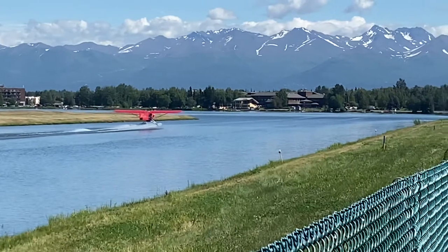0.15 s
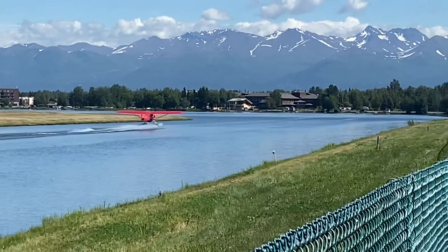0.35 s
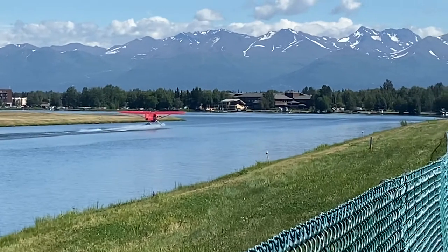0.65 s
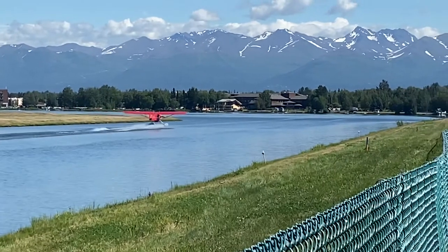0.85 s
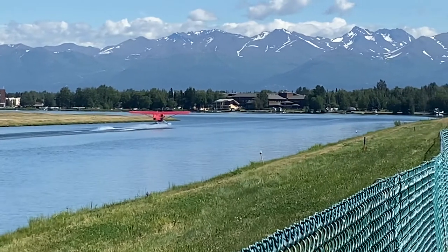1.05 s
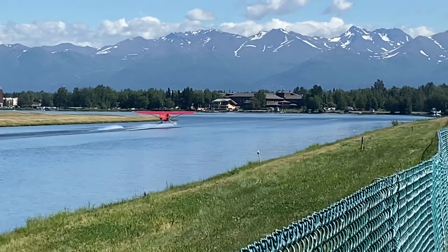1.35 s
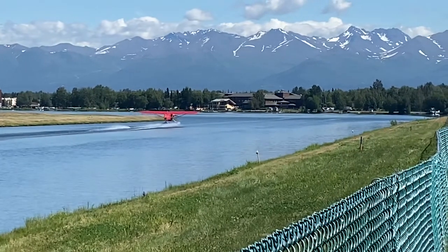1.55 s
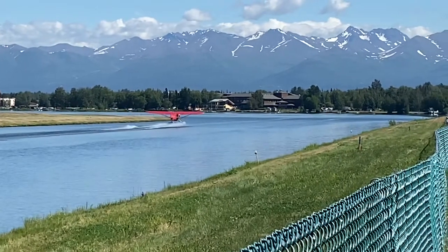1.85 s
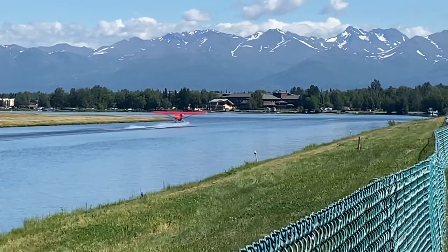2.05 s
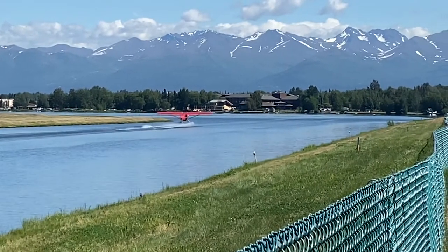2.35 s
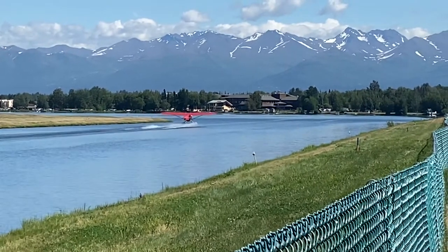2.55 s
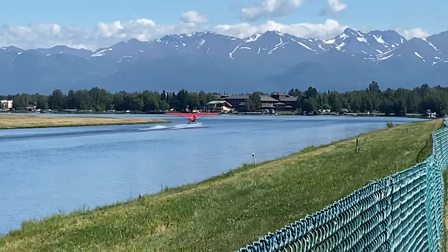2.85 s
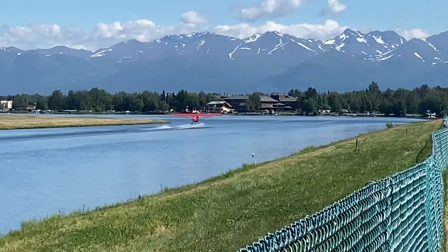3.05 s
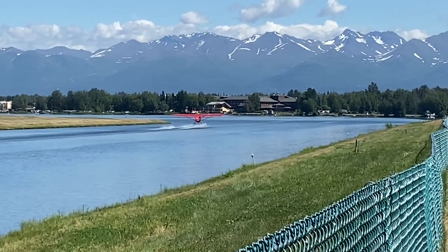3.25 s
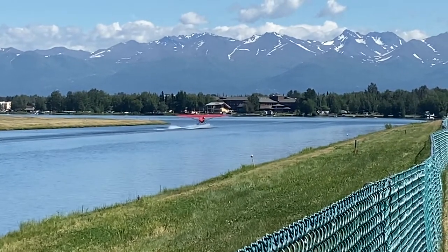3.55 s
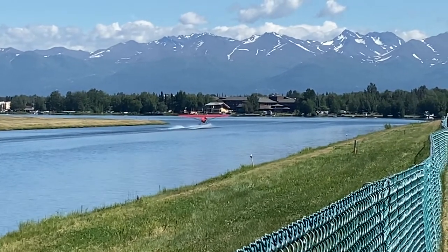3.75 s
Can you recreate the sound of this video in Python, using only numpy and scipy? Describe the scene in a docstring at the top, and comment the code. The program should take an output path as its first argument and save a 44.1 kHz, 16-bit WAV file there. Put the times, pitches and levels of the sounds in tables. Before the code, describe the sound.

Outdoors at a lakeshore, a distant propeller plane drones steadily, its pitch sinking and treble fading. A second low hum wavers beneath it, with soft wind thumps on the handheld microphone and a brief bird trill.

```python
"""On an open lake a float plane taxis away, its four-cylinder engine slowly throttling back.
The exhaust is a harmonic series plus ringing pulses; the propeller air and spray are shaped noise
that dulls with distance. A second drone, a gliding sine, fades in and out over the water.
Bumps of low noise are wind on the microphone; a small bird chirps in gliding sines."""
import sys
import numpy as np
from scipy import signal
from scipy.fft import rfft, irfft, next_fast_len
from scipy.io import wavfile
from scipy.ndimage import uniform_filter1d, map_coordinates

SR = 44100
rng = np.random.default_rng(int(sys.argv[2]) if len(sys.argv) > 2 else 0)


def log_audio(samples):
    """Write samples as a 16-bit WAV file to the path given in sys.argv[1]."""
    # one column per channel
    frames = np.atleast_2d(samples).T
    # limit to full scale, then quantise
    limited = np.clip(frames, -1, 1)
    pcm = np.round(limited * 32767).astype(np.int16)
    wavfile.write(sys.argv[1], SR, pcm)


N = 172431


def amp(db):
    """Decibel law: 20 dB is a factor of ten in amplitude."""
    return 10 ** (np.asarray(db) / 20)


def unit(x):
    """Normalisation: scale to an rms of 1."""
    return x / np.sqrt(np.mean(x ** 2) + 1e-20)


def clock():
    """Sampling: the time of each sample in seconds."""
    return np.arange(N) / SR


def bell(x, centre, width):
    """Gaussian: a smooth hump of height 1, width being its standard deviation."""
    return np.exp(-.5 * ((x - centre) / width) ** 2)


def along(points, hz):
    """Interpolation of (Hz, value) points on a logarithmic frequency axis."""
    f, v = np.transpose(points)
    return np.interp(np.log(hz + 1), np.log(f + 1), v)


def curves(rows):
    """Interpolation in time: one value per sample for each column after the first."""
    seconds, *columns = np.transpose(rows)
    return [np.interp(clock(), seconds, column) for column in columns]


def wobble(rate, size=8192):
    """Slow random modulation: a smooth curve through rate random knots a second."""
    return map_coordinates(rng.standard_normal(size), [clock() * rate], mode="wrap")


def filtered(x, response):
    """Linear filtering: the spectrum of x times a response of frequency."""
    m = next_fast_len(N + SR // 2)
    return irfft(rfft(x, m) * response(np.fft.rfftfreq(m, 1 / SR)), m)[..., :N]


# Coherence of the two channels. Each row: frequency in Hz, left-right correlation.
ALIKE = [(60, 0.93), (180, 0.9), (350, 0.76), (700, 0.63), (1300, 0.46), (1800, 0.54), (2300, 1), (6000, 1)]


def rush(spectrum):
    """Partial coherence: coloured stereo noise of rms 1, its mid-side balance set by ALIKE."""
    def turn(hz):
        return np.arccos(np.clip(along(ALIKE, hz), -1, 1)) / 2

    def response(hz):
        return amp(along(spectrum, hz)) * [np.cos(turn(hz)), np.sin(turn(hz))]

    mid, side = filtered(rng.standard_normal((2, N)), response)
    return unit(np.array([mid + side, mid - side]))


# Engine speed. Each row: time in seconds, cylinder firings per second.
SPEED = [(0, 62.4), (.7, 61.2), (1.2, 60.75), (1.5, 60), (1.8, 59), (2.25, 58), (2.55, 57.6), (2.8, 56.6),
         (3.05, 55.4), (3.5, 53.7), (3.91, 52.2)]
CYLINDERS = 4


def firings():
    """Phase as the integral of rate: the running count of cylinder firings."""
    return np.cumsum(curves(SPEED)[0]) / SR


# Exhaust lines, from the firing rate up by single multiples of the engine cycle.
# Each entry: starting rms level in dB, before ENGINE_DB, flutter and the lean of the scene.
LINE_DB = [-31.7, -41.5, -52, -43, -31.9, -45.5, -49, -45.5, -40.4, -52, -62, -54, -51, -56, -60, -51, -55]
ENGINE_DB, FADE_DB_PER_S = 1, 1.73  # gain of all the lines, and their fade with distance
FLUTTER_DB, FLUTTER_RATE = 1, 4  # depth, and random knots per second


def throb():
    """Harmonic series of the engine cycle; each line flutters on its way over the water."""
    cycle = firings() / CYLINDERS
    lines = np.zeros(N)
    for order, db in enumerate(LINE_DB, CYLINDERS):
        level = amp(db + FLUTTER_DB * wobble(FLUTTER_RATE))
        lines += level * np.sin(2 * np.pi * (order * cycle + rng.random()))
    return np.sqrt(2) * lines * amp(ENGINE_DB - FADE_DB_PER_S * clock())


# Response of the exhaust pipe. Each row: frequency in Hz, relative gain in dB.
PIPE = [(120, -40.5), (220, -10.5), (300, -13.5), (350, -1.5), (435, -1), (500, -12.5), (750, -8.5),
        (930, -7), (1400, -20), (3000, -27), (6000, -50.5), (10000, -90)]
# Strength of each cylinder's pulse in turn. Each entry: relative level in dB.
CYLINDER_DB = [-2, 1, 2, 7]
BARK_DB, BARK_FADE_DB_PER_S = -44.5, 7.5  # level at the start before lean, and its fade
BARK_SCATTER_DB, BARK_JITTER_S = 2, .0002  # standard deviations from pulse to pulse


def bark(ring_s=0.019):
    """Impulse excitation: one uneven pulse per firing rings in the pipe, falling 60 dB in ring_s."""
    at = np.flatnonzero(np.diff(np.floor(firings())))
    chance = rng.standard_normal((len(at), 2))
    at = np.clip(at + chance[:, 0] * BARK_JITTER_S * SR, 0, N - 1).astype(int)
    strength_db = np.resize(CYLINDER_DB, len(at)) + BARK_SCATTER_DB * chance[:, 1]
    pulses = np.bincount(at, amp(strength_db), N)
    t = np.arange(SR // 10) / SR
    ring = rng.standard_normal(len(t)) * amp(-60 * t / ring_s)
    rung = signal.fftconvolve(pulses, ring)[:N]
    rasp = unit(filtered(rung, lambda hz: amp(along(PIPE, hz))))
    return rasp * amp(BARK_DB - BARK_FADE_DB_PER_S * clock())


# Higher engine lines. Each entry: multiple of the engine cycle.
WHINE_ORDERS = [24, 28, 29, 40]
# Their strengths. Each entry: rms level in dB at the height of the swell, before flutter and lean.
WHINE_DB = [-54, -50.8, -59, -59.5]
WHINE_AT_S, WHINE_WIDTH_S = 0.64, 0.42  # centre and standard deviation of the swell
WHINE_SMEAR, WHINE_SMEAR_RATE = .06, 14  # phase wander in turns, and knots per second
WHINE_FLUTTER_DB, WHINE_FLUTTER_RATE = 2.6, 9  # depth, and knots per second


def whine():
    """Random phase and amplitude modulation: high engine lines broken up by the air swell and fade."""
    cycle = firings() / CYLINDERS
    lines = np.zeros(N)
    for order, db in zip(WHINE_ORDERS, WHINE_DB):
        level = amp(db + WHINE_FLUTTER_DB * wobble(WHINE_FLUTTER_RATE))
        turns = order * cycle + WHINE_SMEAR * wobble(WHINE_SMEAR_RATE) + rng.random()
        lines += level * np.sin(2 * np.pi * turns)
    return np.sqrt(2) * lines * bell(clock(), WHINE_AT_S, WHINE_WIDTH_S)


def patchy(x, depth_db, band_size=7, time_size=40):
    """Random scattering: moving air lifts and sinks narrow bands, a fraction of a second at a time."""
    z = signal.stft(x, nperseg=1024)[2]
    field = uniform_filter1d(rng.standard_normal(z.shape[1:]), band_size, 0)
    field = uniform_filter1d(field, time_size, 1)
    return signal.istft(z * amp(depth_db * unit(field)), nperseg=1024)[1][:, :N]


# Propeller and spray levels, before the part gains below, chop, patchiness and lean.
# Each row: time in seconds, level in dB of the low mids, of the mids, of the treble, of the top.
WASH = [(0.029, -47, -45.5, -49, -57), (0.129, -50, -50.5, -50.5, -61.5), (0.56, -44.5, -52.5, -52, -63.5),
        (1.22, -45.5, -47.5, -56.5, -73.5), (1.65, -46.5, -50.5, -59.5, -81.5),
        (1.87, -41, -47.5, -59.5, -83), (1.97, -45, -50, -60.5, -81.5), (2.38, -44.5, -50, -59, -85),
        (2.77, -44.5, -50.5, -63, -89.5), (3.39, -51.5, -55.5, -65.5, -94),
        (3.55, -49, -53.5, -65.5, -89.5), (3.82, -46, -53, -63.5, -91.5), (3.861, -44, -53, -63.5, -99.5)]
# Spectra of the four parts. Each row: frequency in Hz, relative density in dB per Hz.
LOW_MIDS = [(90, -25), (160, -2), (260, 4.5), (450, 6), (540, -1.5), (700, -38), (2000, -120)]
MIDS = [(300, -63.5), (470, -8), (580, -3), (900, -7), (1150, -11), (1400, -25.5), (3200, -120)]
TREBLE = [(800, -56), (1100, 1), (1350, 4), (1800, 2), (2600, -4), (3200, -9.5), (4000, -15.5),
          (5200, -26.5), (9000, -80)]
TOP = [(2000, -38.5), (2600, -6.5), (3300, 6.5), (4000, -0.5), (5000, -1), (6400, -5), (7500, -11.5),
       (8300, -17), (9000, -28.5), (12000, -38.5)]
LOW_MIDS_DB, MIDS_DB, TREBLE_DB, TOP_DB = -2, 0.5, 0.5, 2  # gains added to the WASH columns
CHOP_SHARE, CHOP_FADE_S = 0.32, 0.9  # modulation depth at the start, and its time constant
PATCHY_DB = 1.4  # rms depth of the patches


def wash(waver_db=0.33, waver_rate=14):
    """Amplitude-modulated turbulence: propeller air and spray, chopped at the firing rate while near."""
    depth = CHOP_SHARE * np.exp(-clock() / CHOP_FADE_S)
    chop = 1 + depth * np.cos(2 * np.pi * firings())
    spectra = (LOW_MIDS, MIDS, TREBLE, TOP)
    gains_db = (LOW_MIDS_DB, MIDS_DB, TREBLE_DB, TOP_DB)
    roar = np.zeros((2, N))
    for level, spectrum, db in zip(curves(WASH), spectra, gains_db):
        roar += rush(spectrum) * amp(level + db + waver_db * wobble(waver_rate))
    return chop * patchy(roar, PATCHY_DB)


# Short and long swells of banded noise; the 278.5 Hz row is a low, lingering engine hum.
# Each row: centre time in seconds, width in seconds, centre frequency in Hz, spread in Hz,
# level in dB at the height of the swell, before lean.
BAND_SWELLS = [(.17, 0.12, 920, 70, -52), (.38, .12, 3300, 170, -67.5), (1.55, .35, 5460, 540, -81.5),
               (1.84, .09, 465, 105, -46.5), (2.45, 0.16, 2450, 202.1, -67.5), (2.64, 0.15, 777, 120, -55),
               (3.399, .5, 278.5, 20, -55.5)]


def band_swells():
    """Band-limited noise: short and long swells, each confined to one Gaussian band."""
    out = np.zeros((2, N))
    for s, width, hz, spread, db in BAND_SWELLS:
        flat = rush([(hz, 0)])
        band = unit(filtered(flat, lambda f: bell(f, hz, spread)))
        out += amp(db) * bell(clock(), s, width) * band
    return out


# The second drone. Each row: time in seconds, pitch in Hz, rms level in dB before lean.
DRONE = [(0, 99.9, -29), (.45, 98.7, -27.5), (.75, 97, -29), (1.05, 99.3, -37), (1.4, 100.5, -36.5),
         (1.7, 99.1, -39), (2.05, 98.63, -35.5), (2.45, 97.66, -36), (2.6, 99.2, -49.5), (2.8, 98, -28),
         (3.08, 98.3, -59.5), (3.35, 95.7, -44), (3.55, 95.15, -33.5), (3.91, 93.87, -45.5)]


def drone():
    """Pure tone of gliding frequency: a low hum, probably another aircraft, fades in and out."""
    hz, db = curves(DRONE)
    return np.sqrt(2) * amp(db) * np.sin(2 * np.pi * np.cumsum(hz) / SR)


# Bird notes. Each row: start in seconds, length in seconds, starting pitch in Hz,
# pitch it settles towards in Hz, peak level in dB, trill depth from 0 to 1.
CHIRPS = [(.735, .035, 7400, 7150, -76, 0), (1.165, .048, 6900, 6600, -71, 0),
          (1.968, .055, 7650, 6800, -78, .25), (2.06, .046, 7800, 7080, -79.5, .25),
          (2.138, .09, 4560, 4220, -56.8, .85)]
CHIRP_SETTLE = 3  # time constants of the pitch glide per note
TRILL_HZ, TRILL_SWING_HZ = 59, 100  # trill rate, and pitch swing at full depth
TRILL_RASP_HZ, RASP_RATE = 115, 900  # random pitch wander at full depth, and knots per second


def bird():
    """Frequency modulation: thin falling notes, the last one a buzzy trill."""
    out = np.zeros(N)
    for s, length, start_hz, end_hz, db, trill in CHIRPS:
        t = clock() - s
        u = np.clip(t / length, 0, 1)  # progress through the note
        beat = 2 * np.pi * TRILL_HZ * t
        buzz = TRILL_RASP_HZ * wobble(RASP_RATE) - TRILL_SWING_HZ * np.sin(beat)
        glide = end_hz + (start_hz - end_hz) * np.exp(-CHIRP_SETTLE * u)
        hz = glide + trill * buzz
        arch = 2 * np.sqrt(u * (1 - u))  # silent before and after the note
        swell = arch * (1 - trill * (1 + np.cos(beat)) / 2)
        out += amp(db) * swell * np.sin(2 * np.pi * np.cumsum(hz) / SR)
    return out


# Wind bumps. Each row: centre in seconds, width in seconds, level in dB at the height of the bump.
BUMPS = [(.15, .016, -28), (.36, .04, -31.5), (.81, .025, -25.5), (1.46, .025, -26), (1.5, .008, -25),
         (1.73, .04, -36), (2.11, .025, -34.5), (3.87, .025, -30.5)]
# Spectra of bumps and rumble. Each row: frequency in Hz, relative density in dB per Hz.
BUMP_SPECTRUM = [(20, -30), (30, -9), (42, 0), (60, 1), (85, -2), (130, -12), (200, -22), (400, -44),
                 (2000, -130)]
RUMBLE = [(20, -38), (33, -16), (46, -5.5), (65, 6), (85, -8), (120, -9), (200, -17), (400, -34.5),
          (1500, -120)]
RUMBLE_DB, RUMBLE_FADE_DB_PER_S = -38.3, 1.1  # level at the start, and its fade


def wind():
    """Turbulent pressure: low rumble with short, soft bumps of wind on the microphone."""
    t = clock()
    out = rush(RUMBLE) * amp(RUMBLE_DB - RUMBLE_FADE_DB_PER_S * t)
    eddies = rush(BUMP_SPECTRUM)
    for s, width, db in BUMPS:
        shape = bell(t, s, width)
        bump = unit(shape * eddies) * np.sqrt(np.mean(shape ** 2))
        out += amp(db) * bump
    return out


# Spectrum of the background. Each row: frequency in Hz, relative density in dB per Hz.
AIR = [(500, 0), (4000, -10), (7000, -3.5), (8200, -9), (9000, -19.5), (12000, -16.5)]
AIR_DB = -89


def air():
    """Stationary noise: a very faint, even hiss."""
    return amp(AIR_DB) * rush(AIR)


def scene(lean_db=0.38):
    """Superposition in open air, plane and drone a little to the left by level difference."""
    plane = throb() + bark() + wash() + band_swells() + whine()
    leaning = (plane + drone()) * amp([[lean_db], [-lean_db]])
    return leaning + wind() + bird() + air()


CUTOFF_HZ = 12400


def record(dry):
    """Band limitation: the recorder keeps nothing above its cutoff."""
    return filtered(dry, lambda hz: hz < CUTOFF_HZ)


dry = scene()
out = record(dry)
log_audio(out)
```